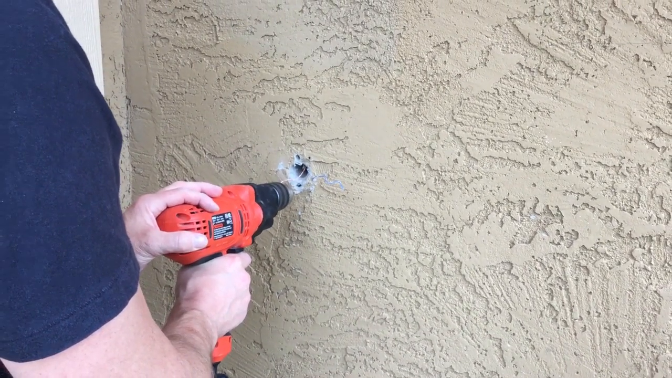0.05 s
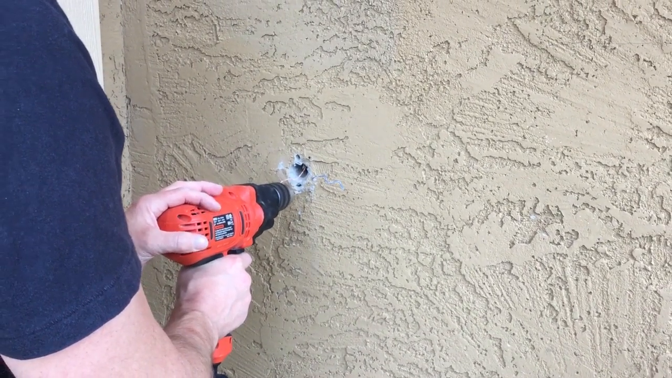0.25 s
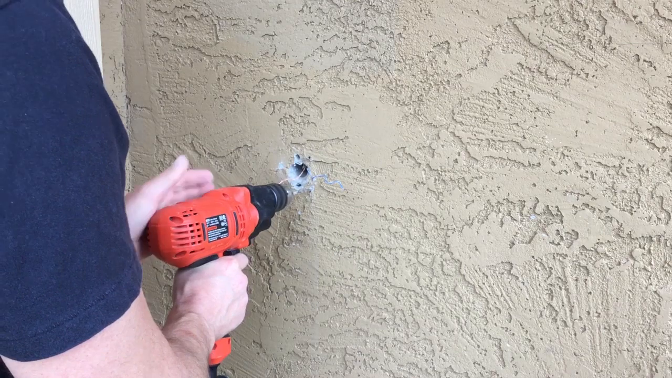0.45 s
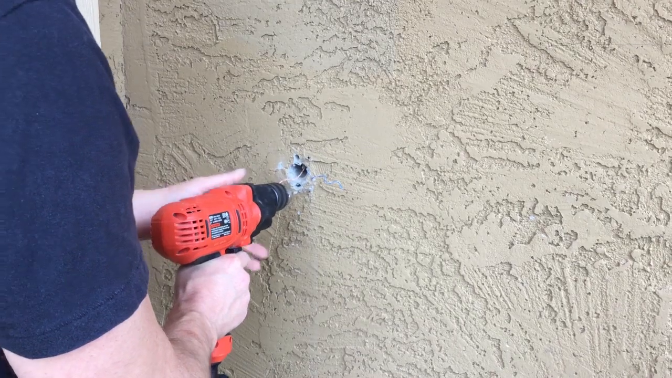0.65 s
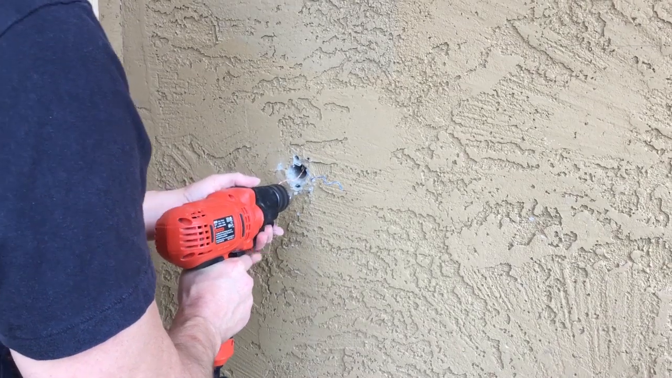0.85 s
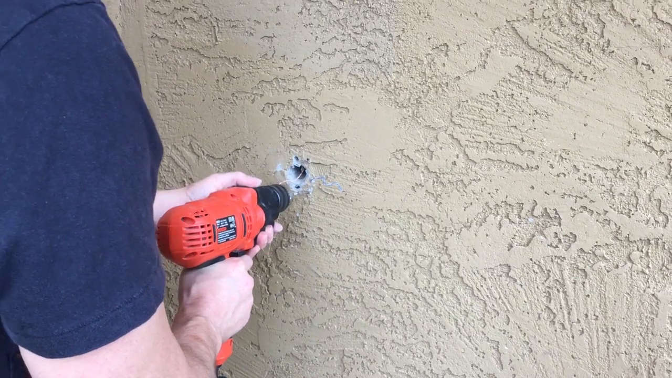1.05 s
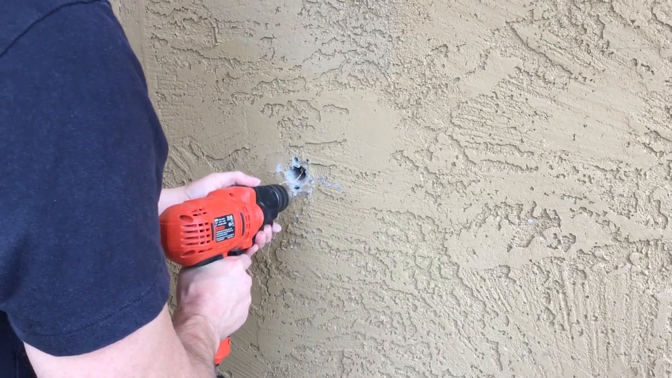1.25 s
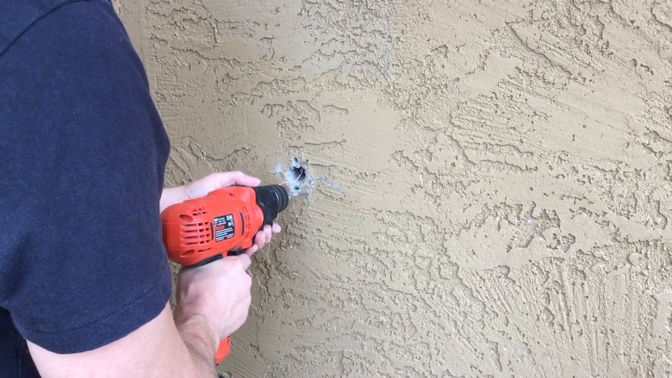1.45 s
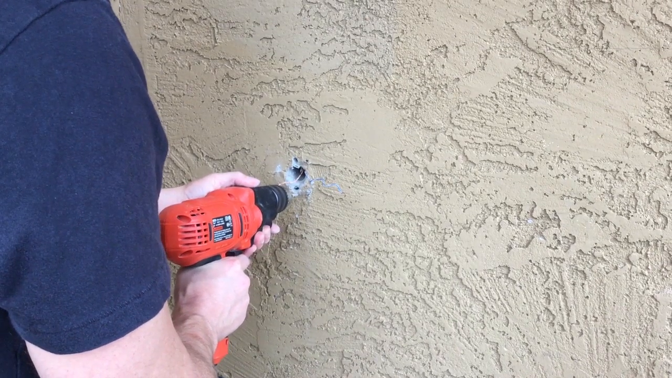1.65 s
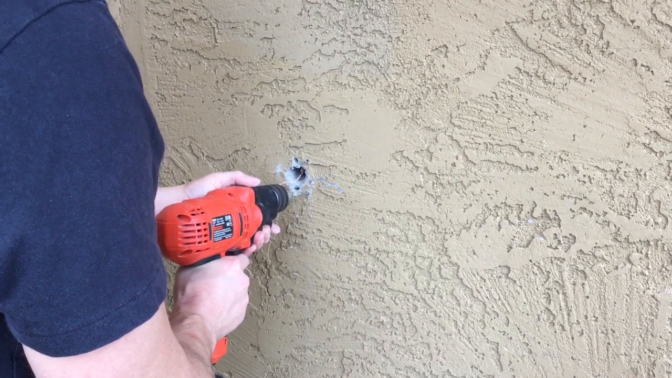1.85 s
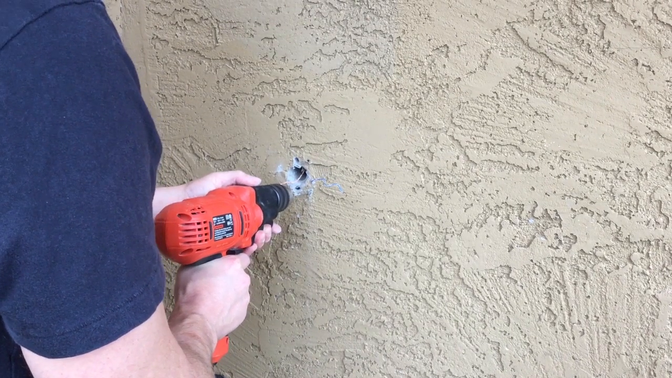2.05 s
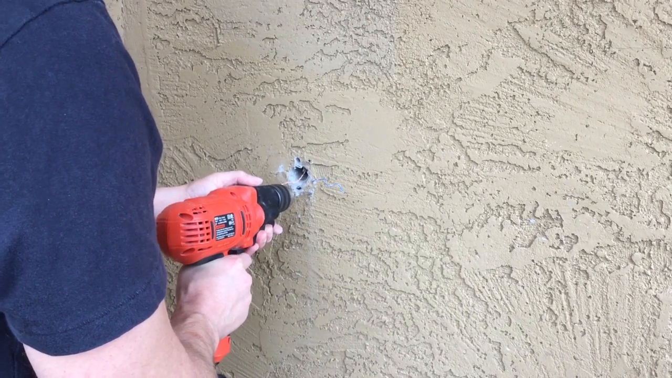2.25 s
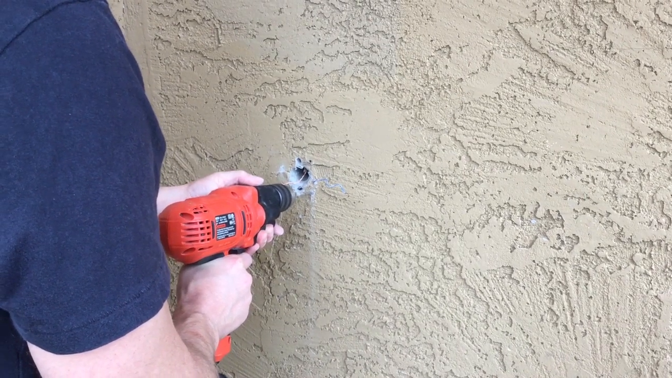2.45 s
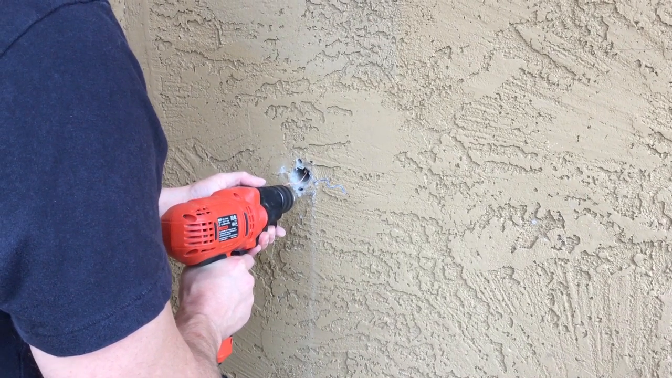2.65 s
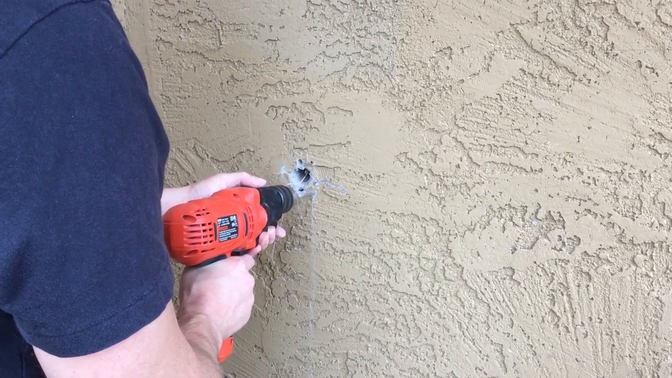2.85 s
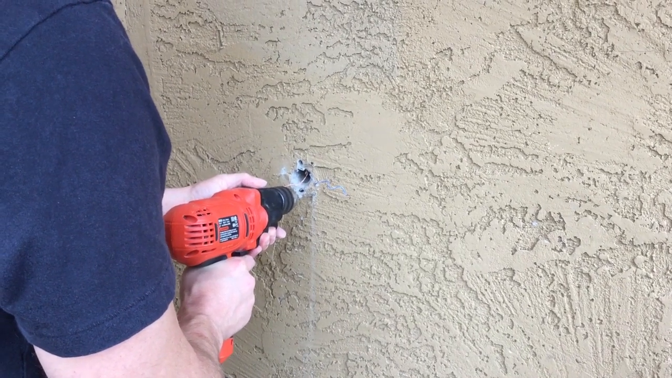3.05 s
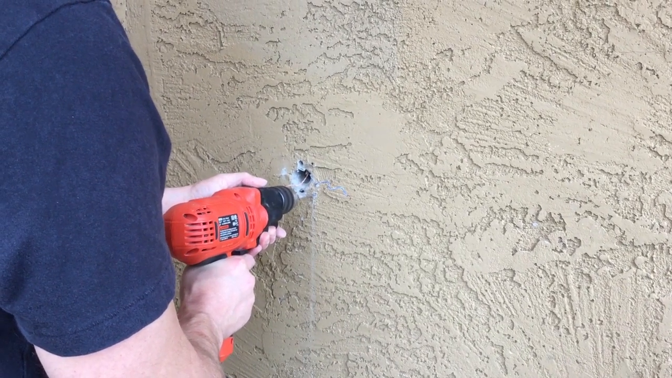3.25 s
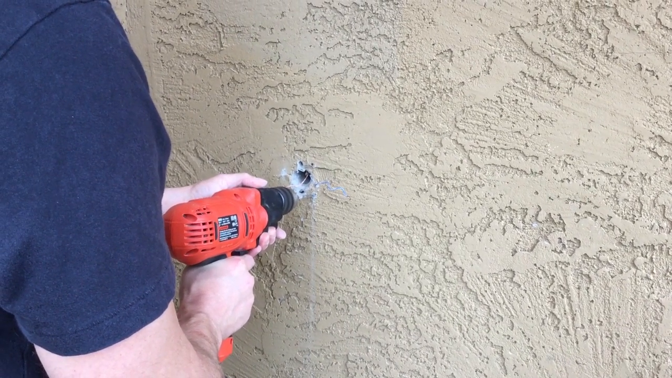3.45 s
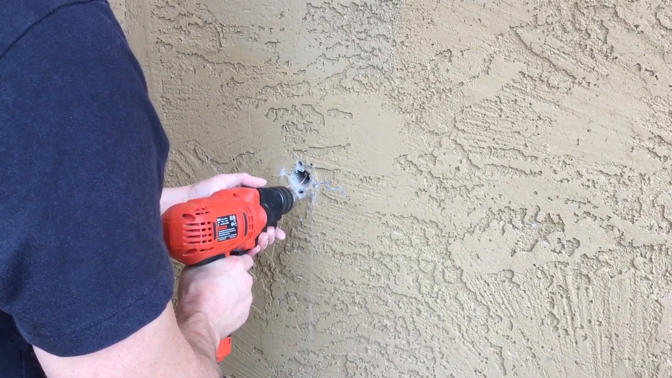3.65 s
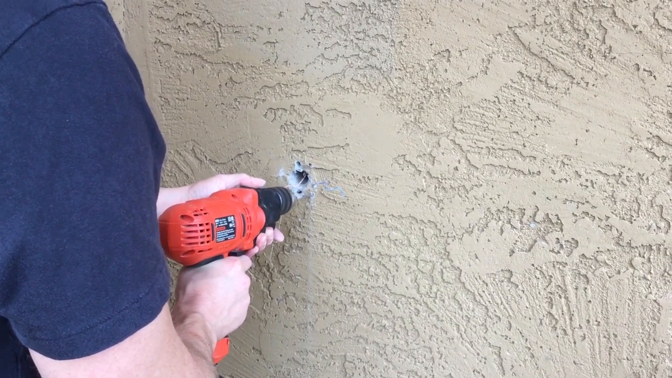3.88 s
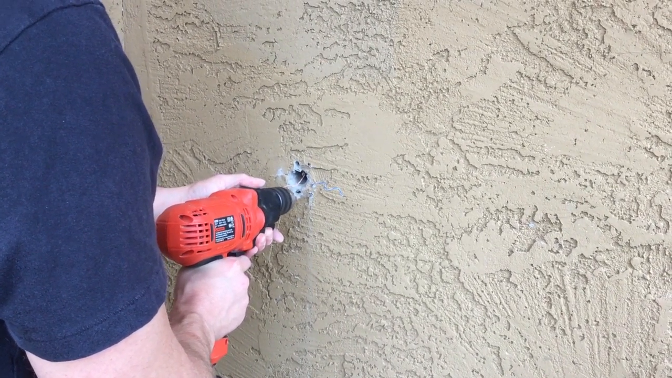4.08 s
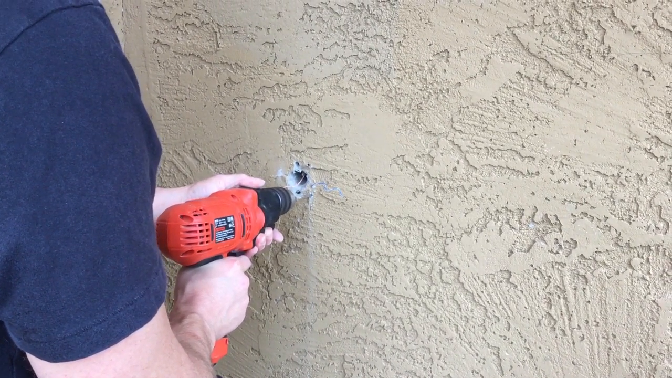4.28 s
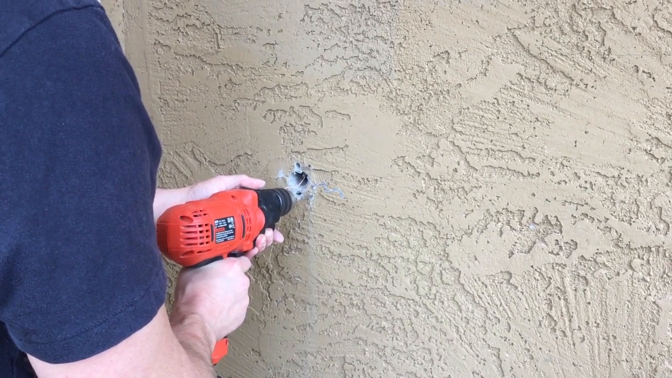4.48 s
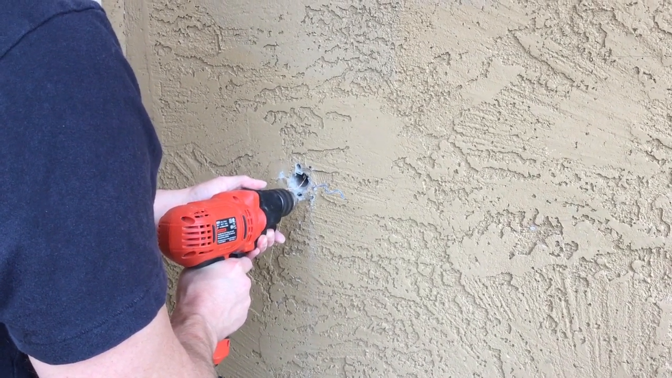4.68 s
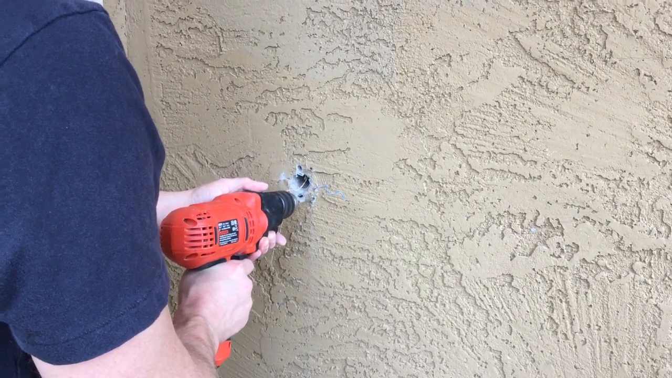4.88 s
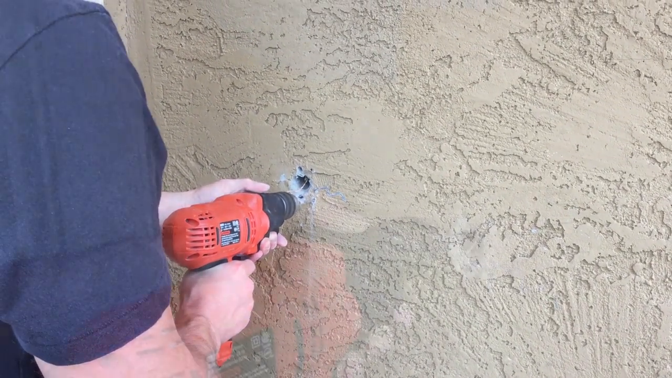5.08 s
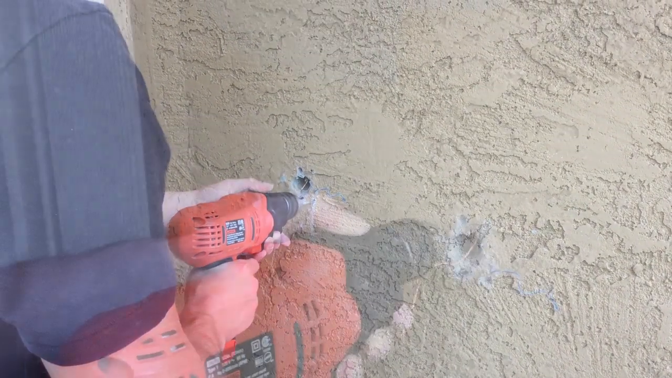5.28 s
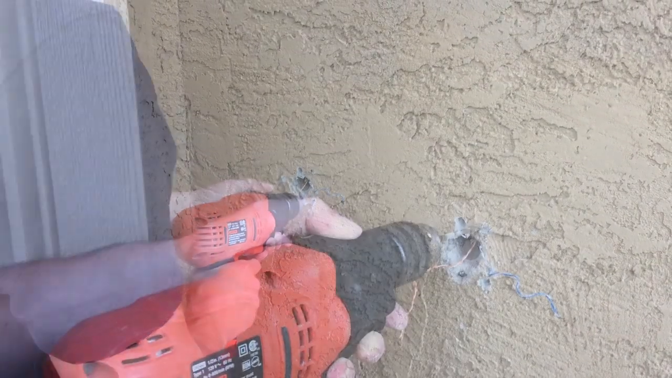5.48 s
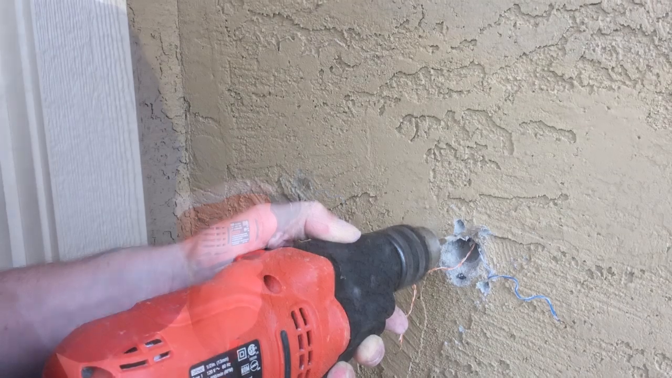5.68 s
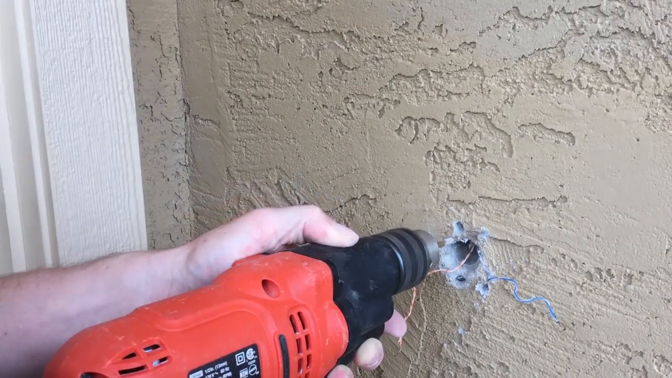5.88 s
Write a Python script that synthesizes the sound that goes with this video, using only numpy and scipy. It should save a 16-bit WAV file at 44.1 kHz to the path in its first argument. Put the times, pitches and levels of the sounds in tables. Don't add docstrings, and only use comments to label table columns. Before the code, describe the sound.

Outdoors, a corded drill rasps into a stucco wall at moderate distance. Two short trigger squeezes rise and die, separated by quiet low traffic rumble; then a long grind gains speed and whine, with dull wall knocks and a brief squeal. The scene cuts to a nearer microphone, where sharp clicks lead into a bright, louder restart.

```python
import sys
import numpy as np
from scipy import signal
from scipy.io import wavfile
from scipy.ndimage import uniform_filter1d

SR = 44100
rng = np.random.default_rng(int(sys.argv[2]) if len(sys.argv) > 2 else 0)


def inscribe(sig):
    pcm = np.round(np.clip(np.atleast_2d(sig).T, -1, 1) * 32767)
    wavfile.write(sys.argv[1], SR, pcm.astype(np.int16))


def magnitude_from_level(level_db):
    exponent = np.asarray(level_db, float) / 20
    return 10 ** exponent


N = 261072
CUT_S = 5.483


def evened(x):
    return x / np.sqrt(np.mean(x ** 2) + 1e-20)


def read(points, hz):
    f, value = np.transpose(points)
    return np.interp(np.log(hz + 1), np.log(f + 1), value)


def add(mix, s, sound):
    part = mix[round(s * SR):][:len(sound)]
    part += sound[:len(part)]


def band(x, lo_hz, hi_hz):
    sos = signal.butter(3, [lo_hz, min(hi_hz, .49 * SR)], "band", fs=SR, output="sos")
    return signal.sosfiltfilt(sos, x)


def wander(per_s):
    length = int(SR / per_s)
    smooth = uniform_filter1d(rng.standard_normal(N), length)
    return evened(uniform_filter1d(smooth, length))


def coloured(x, gain_db):
    log_gain = np.log(magnitude_from_level(np.maximum(gain_db, -100)))
    circle = np.concatenate([log_gain, log_gain[-2:0:-1]])
    phase = -signal.hilbert(circle).imag
    taps = np.fft.ifft(np.exp(circle + 1j * phase)).real[:4096]
    return signal.oaconvolve(x, taps)[:len(x)]


def patchy(x, depth_db):
    z = signal.stft(x, nperseg=512)[2]
    patches = uniform_filter1d(rng.standard_normal(z.shape[::-1]), 9, axis=0)
    patches = uniform_filter1d(patches, 5, axis=1)
    return signal.istft(z * magnitude_from_level(depth_db * evened(patches).T), nperseg=512)[1][:N]


def bumps(rows, edge):
    out = np.zeros((len(rows[0]) - 2, N))
    for s, length, *db in rows:
        shape = signal.windows.tukey(round(length * SR), edge)
        for track, d in zip(out, db):
            add(track, s, d * shape)
    return out


def gears():
    # t/s, f/Hz
    mesh_track = [(0, 330), (.27, 450), (.7, 250), (.88, 100), (1.27, 300), (1.48, 470), (1.8, 200),
                  (2.0, 380), (2.2, 458), (2.6, 600), (2.95, 690), (3.3, 743), (3.75, 790), (4.75, 847),
                  (5.48, 866), (5.6, 200), (5.7, 400), (5.92, 640)]
    # multiple of the mesh frequency, level/dB
    whine_partials = [(1, -9), (2, -1), (3, -6), (4, -6), (5, 0), (6, 0), (7, -6), (8, -7), (9, -6),
                      (11, -6), (13, -8)]
    pinion_teeth, mains_hz, whine_db = 9, 60, -20.5
    t = np.arange(N) / SR
    mesh_hz = np.interp(t, *np.transpose(mesh_track)) * (1 + .006 * wander(40))
    turns = np.cumsum(mesh_hz) / SR

    meeting = np.diff(np.floor(turns), prepend=0) > 0
    blows = meeting * rng.standard_normal(N) * np.sqrt(SR / mesh_hz)
    chip_size = magnitude_from_level(1.3 * np.minimum(rng.exponential(1, N), 3))
    chips = (rng.random(N) < 500 / SR) * chip_size * rng.choice([-1, 1], N)

    shaft = 2 * np.pi * turns / pinion_teeth
    shaft_db = 1.1 * np.cos(shaft) + .7 * np.cos(2 * shaft)
    mains_db = .55 * np.cos(2 * np.pi * mains_hz * t) * 600 / (mesh_hz + 200)
    load_db = 0.34 * wander(10) + 0.73 * wander(84) + 0.27 * wander(580)

    grit = rng.standard_normal(N) + 0.14 * blows * np.sqrt(800 / mesh_hz) + 0.15 * evened(chips)
    rasp = evened(patchy(grit * magnitude_from_level(shaft_db + mains_db + load_db), .8))
    whine = sum(magnitude_from_level(db + 3.3 * wander(19)) * np.cos(2 * np.pi * k * turns) for k, db in whine_partials)
    return rasp + magnitude_from_level(whine_db) * whine * mesh_hz / 800


def housing(x, modes, colour, damping, lift_db):
    # f/Hz, width/Hz, level/dB
    notches = [(650, 70, -6), (2620, 130, -5), (5380, 300, -4), (13500, 700, -5)]
    hz = np.fft.rfftfreq(8192, 1 / SR)
    rings = 0
    for f, width, db in modes:
        width = max(width, damping * f * f / 220000)
        rings = rings + magnitude_from_level(2 * (db + lift_db)) / (1 + (2 * (hz - f) / width) ** 2) ** 2
    dips_db = sum(db / (1 + (2 * (hz - f) / width) ** 2) for f, width, db in notches)
    power = magnitude_from_level(2 * read(colour, hz)) + rings
    return coloured(x, 10 * np.log10(power) + dips_db)


def drill():
    # t/s, level/dB
    runs = [
        [(0.0, -36.5), (.07, -33.5), (.26, -29), (.4, -32.5), (.52, -33.5), (.65, -37), (.755, -47.5),
         (.82, -63), (.9, -84)],
        [(1.272, -41), (1.278, -34), (1.34, -32.5), (1.47, -28.5), (1.67, -34), (1.76, -45), (1.825, -53),
         (1.93, -33.5), (2.1, -29)],
        [(2.1, -29.5), (2.28, -27), (2.36, -26.5), (2.85, -25.5), (3.2, -24.5), (4.5, -25.5), (4.95, -25),
         (5.24, -26.5), (5.48, -25)],
        [(5.61, -32.5), (5.632, -44), (5.672, -30.5), (5.708, -28.5), (5.876, -22), (5.89, -24.5), (5.92, -21)],
    ]
    # f/Hz, level/(dB per Hz)
    modes_first = [(2070, 50, -2.0), (2230, 29, -7.5), (2620, 150, 1.0), (3000, 83, -2), (3296, 83, 2),
                   (4050, 53, 1.5), (4790, 60, -1.5), (5670, 74, -2.5), (6150, 86, -6), (6800, 49, -9),
                   (8460, 270, -41), (9500, 89, 0.5), (9830, 35, -19), (11000, 61, -11.5),
                   (14900, 1000, -37)]
    colour_first = [(180, -42), (300, -7), (354, -23), (554, -10), (632, -11.5), (746, -10.5), (925, -11.5),
                    (2080, 0.5), (2420, -3), (4110, -1), (7700, -5), (9550, -9), (15700, -28.5)]
    modes_slow = [(2040, 84, 0.5), (2830, 43, -1), (3250, 48, -10), (3430, 35, -15), (4020, 110, -15),
                  (4420, 72, -6.5), (4810, 67, -5.5), (5740, 260, -11.5), (6240, 64, -15),
                  (7300, 170, -15.5), (9590, 61, -12.0), (11000, 93, -18.5), (15000, 1500, -40)]
    colour_slow = [(180, -35), (300, -16.5), (824, -20), (1760, -5), (2010, 0), (2580, -4.5), (4850, -11),
                   (5260, -11), (8940, -18), (9710, -16.5), (15700, -33)]
    modes_second = [ (2014, 40, 1), (2831, 70, -4), (3320, 70, -6), (4350, 120, -10), (4850, 110, -6),
                    (5830, 280, -9), (7480, 200, -18.5), (9400, 300, -17.5), (9700, 400, -16),
                    (11230, 300, -27.5), (14600, 1500, -32),
                    (297, 25, -15), (1793, 40, -10), (2143, 40, -7), (2226, 40, -4), (3148, 55, -8),
                  (3525, 50, -9), (3742, 60, -11), (3882, 35, -9), (4030, 80, -9), (4215, 35, -6),
                  (4496, 45, -8)]
    colour_second = [(180, -46.5), (300, -19.5), (563, -16.5), (632, -16), (710, -17.5), (1310, -12),
                     (1850, -6.5), (2010, -2.5), (2580, -5.5), (2810, -3), (3720, -9), (4930, -5.5),
                     (7960, -18.5), (9550, -12.5), (15700, -42.5)]
    modes_close = [(1118, 34, -7), (2140, 130, 0), (2800, 40, -1.5), (3240, 270, 1.0), (3570, 20, -12),
                   (4040, 230, -21), (4510, 30, -17), (5160, 75, -20), (5780, 150, -3.5), (6540, 72, -4),
                   (7200, 140, -5.5), (9140, 76, -12.5), (9860, 71, -4.5), (11600, 65, -16),
                   (15000, 1400, -28.0)]
    colour_close = [(180, -64), (300, -33), (527, -12), (592, -15.5), (722, -7.5), (852, -25), (940, -14.5),
                    (1980, 4), (2540, -1.5), (4110, -0.5), (5440, -5), (9710, -10), (15700, -27)]
    # top level/dB, low casing level/dB, brush fizz level/dB
    grip_db = [(-5, 0, 2.5), (-1, 2.5, -1), (-1.5, 0, 2), (-3.5, 6, -4.5)]
    grip_damping = (1.9, 1.5, 1.0, 1.3)
    # top/dB, casing/dB, fizz/dB
    thinning = (-0.38, 0.47, -.15)
    full_db = -27
    # t/s, length/s, level/dB, extra top level/dB, extra fizz level/dB
    bites = [(2.44, 0.056, 0.5, 1.5, 3), (2.91, 0.057, 1.5, -0.5, -1), (2.96, .04, 1.5, -1, 4),
             (3.19, 0.054, 0, 2, 1), (4.2, 0.16, .5, 2.5, 2), (5.08, 0.064, 3, 0.5, 0),
             (5.255, 0.1, 5, 1, 3.5), (5.35, .05, -0.5, 0.5, 4), (1.275, .04, -0.5, -1, 2),
             (1.87, 0.033, 0.5, 3.5, 6), (3.97, .05, 1, -0.5, 0)]

    shake, out = gears(), np.zeros(N)
    grips = [(modes_first, colour_first), (modes_slow, colour_slow),
             (modes_second, colour_second), (modes_close, colour_close)]
    ends = [rows[-1][0] for rows in runs[:2]] + [CUT_S, N / SR]
    bite_db, bright_db, fizzy_db = bumps(bites, edge=.3)
    for rows, grip, trim_db, damping, end_s in zip(runs, grips, grip_db, grip_damping, ends):
        sound = housing(shake, *grip, damping, lift_db=4.5)
        low, top, fizz = band(sound, 180, 1180), band(sound, 5830, 13300), band(sound, 11500, 17000)
        middle = sound - low - top - fizz
        start_s = rows[0][0]
        span = np.arange(round(start_s * SR), round(end_s * SR))
        level_db = np.interp(span / SR, *np.transpose(rows)) + bite_db[span]
        thinned_db = np.outer(thinning, full_db - level_db)
        top_db, low_db, fizz_db = np.array(trim_db)[:, None] + thinned_db
        rest = magnitude_from_level(top_db + bright_db[span]) * top[span] + magnitude_from_level(low_db) * low[span]
        rest = rest + magnitude_from_level(fizz_db + fizzy_db[span]) * patchy(fizz, 2.0)[span]
        add(out, start_s, magnitude_from_level(level_db) * (middle[span] + rest) / np.std(middle[span]))
    return out


def yard():
    # f/Hz, level/(dB per Hz)
    yard_before = [(12, -59), (20, -0.5), (81, 6), (127, 3), (204, -7), (228, -9.5), (270, -13.5),
                   (328, -23.5), (388, -22.5), (485, -31), (759, -28), (1190, -32), (3740, -50),
                   (11100, -57), (16000, -74)]
    yard_after = [(18, -24), (30, 1), (81, -11), (189, -12), (280, -11.5), (303, -19), (374, -16),
                  (526, -30), (1430, -44), (10800, -63), (16000, -76)]
    # t/s, length/s, level/dB
    swells = [
        (.75, 0.47, -10),
        (1.95, .2, 4.5),
        (2.4, 0.23, 8.5),
        (2.93, 0.17, 8.5),
        (4.02, .12, 7),
        (5.2, 0.19, 5),
        (5.75, 0.081, 2),
    ]
    t, hz = np.arange(N) / SR, np.fft.rfftfreq(8192, 1 / SR)
    before = coloured(rng.standard_normal(N), read(yard_before, hz))
    after = coloured(rng.standard_normal(N), read(yard_after, hz))
    air_before = magnitude_from_level(-55.5) * evened(band(before, 238, 17000))
    air_after = magnitude_from_level(-52) * evened(band(after, 240, 17000))
    air = np.where(t < CUT_S, air_before, air_after)
    deep_db = -48 + bumps(swells, edge=0.6)[0] + 2.5 * wander(18)
    deep = magnitude_from_level(deep_db) * evened(band(before, 25, 117))
    upper = magnitude_from_level(np.where(t < CUT_S, -46, -57.5)) * evened(band(before, 122.4, 259))
    return patchy(air, 1.5) * magnitude_from_level(.5 * wander(8)) + deep + upper


def drones():
    # start t/s, end t/s, first f/Hz, last f/Hz, level/dB
    engines = [
        (0, 1.9, 133, 142.5, -47),
        (1.8, 2.5, 143, 145.5, -40),
        (.4, 1.27, 204, 208.5, -48),
        (1.88, 2.685, 204, 207, -45.5),
        (3.97, 4.4, 150, 154.5, -44.5),
        (4.36, 5.34, 153.5, 157.5, -38),
        (1, 5.9, 58, 66, -57.5),
        (5.6, 5.92, 93, 96, -51),
    ]
    out = np.zeros(N)
    for s, end_s, first_hz, last_hz, db in engines:
        t = np.arange(0, end_s - s, 1 / SR)[:N]
        glide_hz = first_hz + (last_hz - first_hz) * t / t[-1]
        turns = np.cumsum(glide_hz * (1 + .009 * wander(45)[:len(t)])) / SR
        level = magnitude_from_level(db + 1.3 * wander(30)[:len(t)] + 1.5 * wander(8)[:len(t)])
        fade = np.clip(np.minimum(t, t[-1] - t) / .05, 0, 1)
        add(out, s, np.sqrt(2) * level * np.sin(2 * np.pi * turns) * fade)
    return out


def knocks():
    # t/s, peak level/dB, ring f/Hz, ring t60/s
    wall_blows = [
        (0.431, -28.5, 127, 0.12),
        (0.581, -36, 304, 0.095),
        (2.458, -26.5, 746, 0.054),
        (2.769, -28, 298, 0.24),
        (3.011, -26, 474, 0.081),
        (3.215, -35, 290, 0.16),
        (4.011, -28, 570, 0.1),
        (4.09, -27.5, 292, 0.15),
        (4.288, -39, 289, .2),
    ]
    out, t = np.zeros(N), np.arange(9000) / SR
    for (s, db, hz, t60), grain in zip(wall_blows, rng.standard_normal((len(wall_blows), 9000))):
        push = .8 * np.sin(2 * np.pi * 105 * t) * magnitude_from_level(-60 * t / 0.1)
        puff = .35 * evened(band(grain, 90, 800)) * magnitude_from_level(-60 * t / .1)
        ring = 0.73 * np.sin(2 * np.pi * hz * t) * magnitude_from_level(-60 * t / t60)
        add(out, s, magnitude_from_level(db) * (push + puff + ring) * np.minimum(t / 0.0019, 1))
    return out


def ticks():
    # t/s, peak level/dB, f/Hz, t60/s
    contacts = [(1.2764, -30, 5000.0, 0.014), (1.8038, -32, 5000.0, 0.017), (5.584, -32, 5000.0, 0.042),
                (5.6055, -16, 4830, 0.013), (5.6244, -37, 5000.0, 0.015), (5.6491, -35.5, 5000.0, 0.015),
                (5.6605, -22, 5000.0, 0.014), (5.673, -26, 5000.0, 0.014), (5.69, -20, 5000.0, 0.015),
                (5.7243, -11.5, 5000.0, 0.0146), (.79, -45, 2800, 0.05), (.97, -64, 6480, 0.03),
                (1.729, -47, 8000, 0.013), (1.763, -45, 8000, .012), (1.865, -38, 9000, .03),
                (1.883, -32, 5500, .03)]
    out, t = np.zeros(N), np.arange(2000) / SR
    for (s, db, hz, t60), grain in zip(contacts, rng.standard_normal((len(contacts), 2000))):
        crack = evened(band(grain, 0.37 * hz, 1.56 * hz)) + 0.45 * band(grain, 1200, 15500)
        add(out, s, magnitude_from_level(db - 5 - 60 * t / t60) * crack * np.minimum(t / 0.0017, 1))
    return out


def squeals():
    # start t/s, end t/s, f/Hz, width/Hz, level/dB
    rubs = [
        (5.3, 5.357, 4220, 160, -27),
        (5.27, 5.33, 1720, 120, -34),
        (5.79, 5.89, 4050, 350, -30),
        (5.74, 5.92, 2120, 300, -31),
    ]
    out = np.zeros(N)
    for (s, end_s, hz, width, db), grain in zip(rubs, rng.standard_normal((len(rubs), 14000))):
        whistle = evened(band(grain, hz - width / 2, hz + width / 2))[:round((end_s - s) * SR)]
        add(out, s, magnitude_from_level(db) * whistle * signal.windows.tukey(len(whistle), .4))
    return out


def scene():
    return (drill() + yard() + drones() + knocks() + ticks() + squeals())[None]


def roll_off(x):
    return signal.sosfilt(signal.butter(12, 16410, fs=SR, output="sos"), x)


def record(dry):
    dry = signal.sosfilt(signal.butter(4, 42, "high", fs=SR, output="sos"), dry)
    band_limit = signal.firwin(511, 15800, window=("kaiser", 9), fs=SR)
    dry = signal.oaconvolve(dry, band_limit[None], "same")
    dry = .6 * np.tanh(dry / .6)
    return roll_off(dry)


dry = scene()
out = record(dry)
inscribe(out)
```